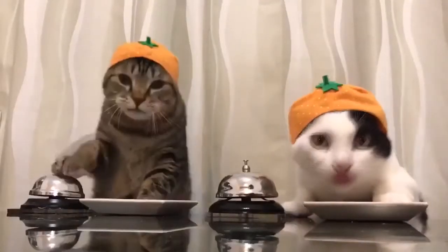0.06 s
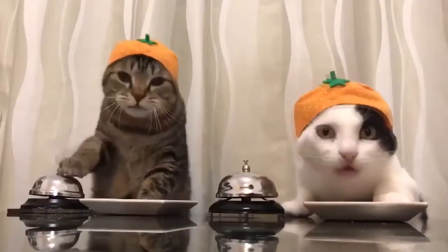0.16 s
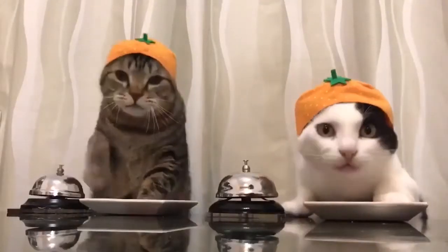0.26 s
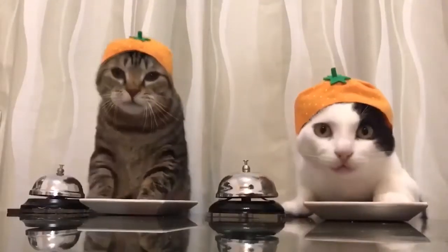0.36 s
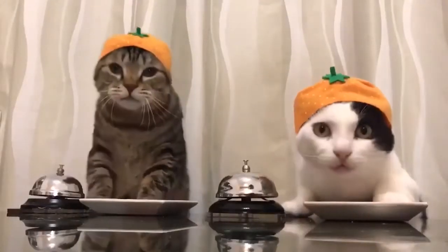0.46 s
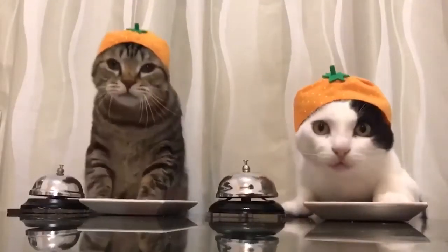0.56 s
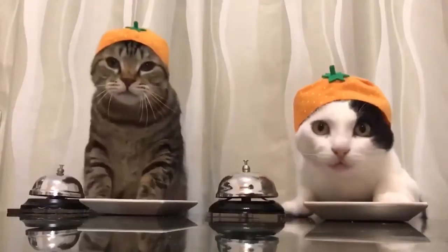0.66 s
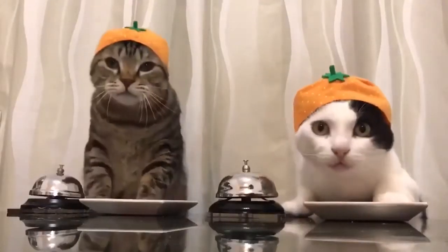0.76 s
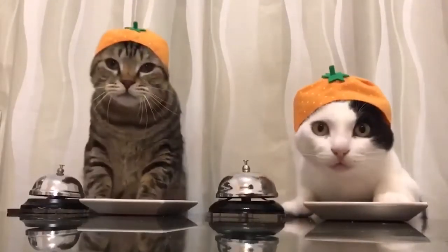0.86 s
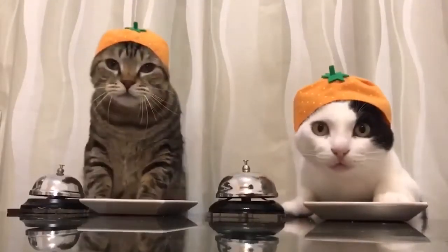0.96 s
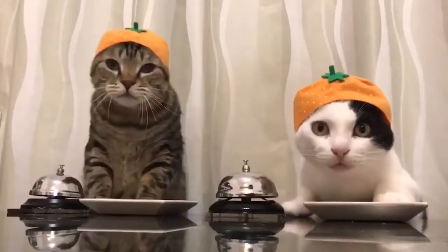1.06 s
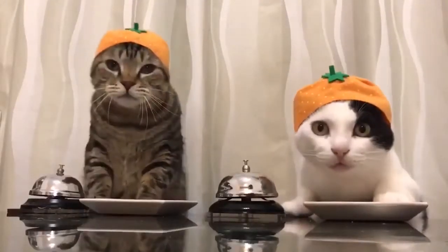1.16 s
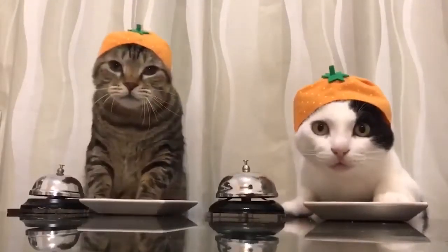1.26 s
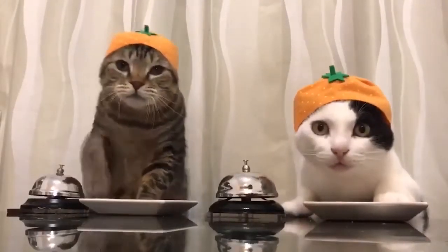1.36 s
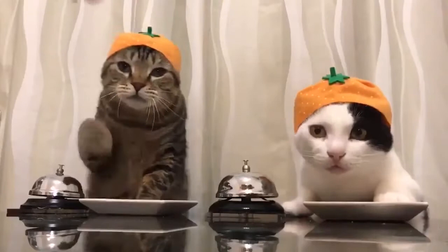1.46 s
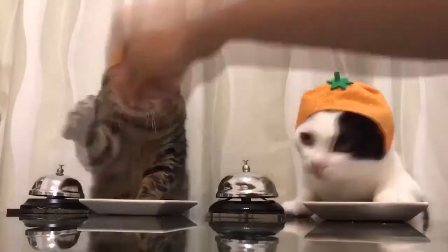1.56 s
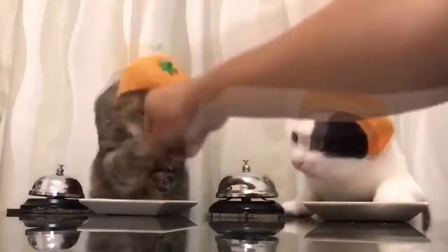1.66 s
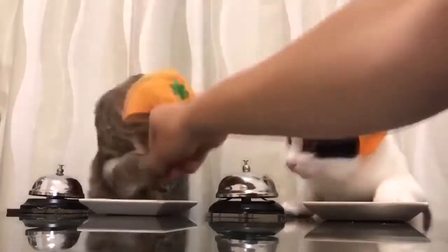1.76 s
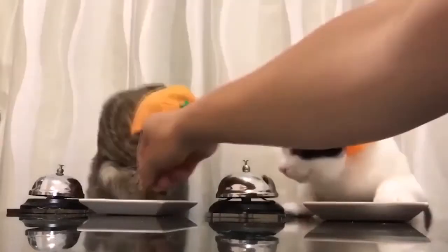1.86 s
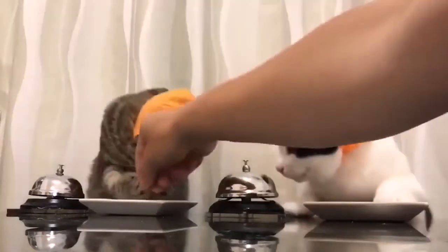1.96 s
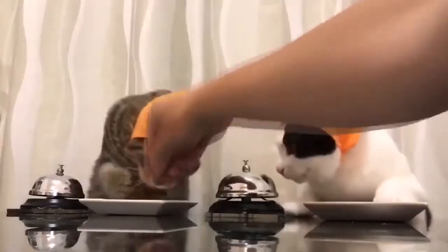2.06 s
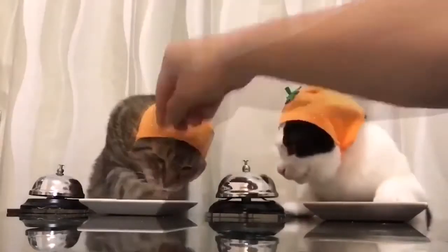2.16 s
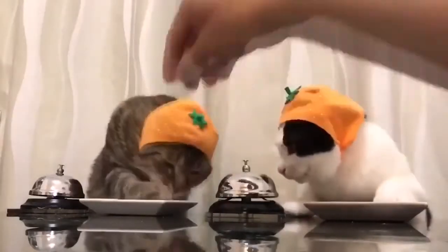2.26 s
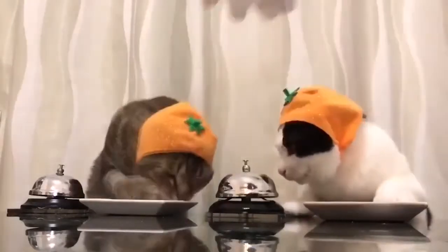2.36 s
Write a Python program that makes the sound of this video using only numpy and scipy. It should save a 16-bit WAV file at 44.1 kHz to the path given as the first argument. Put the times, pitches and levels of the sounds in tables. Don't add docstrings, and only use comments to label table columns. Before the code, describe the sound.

Desk bell struck by a cat's paw, loud piercing ding ringing long, then a treat tapping a plate

```python
import sys
import numpy as np
from scipy import signal
from scipy.fft import rfft, irfft, next_fast_len
from scipy.io import wavfile

SR = 44100
rng = np.random.default_rng(int(sys.argv[2]) if len(sys.argv) > 2 else 0)


def invert_db(x):
    u = np.asarray(x, float) / 20
    return 10 ** u


def generate_wav(sig):
    pcm = np.round(np.clip(np.atleast_2d(sig).T, -1, 1) * 32767).astype(np.int16)
    wavfile.write(sys.argv[1], SR, pcm)


N = 105840

# (frequency [Hz], level [dB])
HUM_COLOUR = [(25, -9.5), (40, -3), (80, -3), (160, -14), (500, -21), (2200, -30.5), (3400, -48),
              (15900, -66.5)]
# (time [s], level [dB])
RUSTLE = [
    (1.3, -87),
    (1.6, -73),
    (2.1, -70.5),
    (2.2, -70.5),
    (2.4, -79.5),
]
# (time [s], level [dB])
SLEEVE_TICKS = [
    (1.822, -64),
    (1.870, -54.5),
    (1.885, -64.5),
]
SLEEVE_COLOUR = [(200, -20), (2000, -1.5), (4000, -5), (6500, 4), (9000, -4), (15900, -31.5)]
# (time [s], level [dB])
STEPS = [(.378, -38), (.483, -44), (.512, -37.5), (.621, -37), (.645, -42.5), (1.1125, -55.5),
         (1.459, -67.5), (1.564, -48), (1.584, -41), (1.797, -52.5), (2.013, -54.5), (2.064, -58)]
# (frequency [Hz], level [dB])
STEP_COLOUR = [(150, -10.5), (400, -2), (900, 6), (1600, 10.5), (2400, -8.5), (3200, -28.5), (6500, -49),
               (15900, -62.5)]
# (time [s], level [dB])
RUMBLES = [
    (.06, -35),
    (.09, -31),
    (.14, -35.5),
    (.24, -25),
    (.44, -35.5),
    (.52, -35.5),
    (.6, -41.5),
    (1.5, -53),
    (2.2, -40),
]
# (frequency [Hz], level [dB])
RUMBLE_COLOUR = [(40, -7.5), (90, -2.5), (200, 0.5), (400, -6), (900, -15), (2500, -28), (4000, -59),
                 (15900, -94.5)]
# (time [s], level [dB])
THUMPS = [
    (.064, -23.5),
    (.255, -31),
    (.47, -35.5),
    (1.56, -36),
]
# (frequency [Hz], level [dB], 60 dB decay [s])
TABLE_MODES = [(92.6, 9.5, .45), (140, -10, .3), (215, -10, .3), (374, -10.5, .2)]
# (time [s], level [dB])
TREAT = [
    (2.178, -66),
    (2.1975, -31),
    (2.211, -58),
    (2.240, -50.5),
    (2.293, -51.5),
    (2.336, -51.5),
    (2.368, -45.5),
    (2.398, -51),
]
# (frequency [Hz], level [dB])
TREAT_COLOUR = [(150, -17), (400, 6), (1500, 12), (2300, -4), (4800, 2), (7000, 5), (9000, -10),
                (15900, -20.5)]
# (frequency [Hz], level [dB], 60 dB decay [s])
PLATE_MODES = [(382, -22.5, 0.09), (920, -28, 0.045), (1560, -16.5, 0.013), (4886, -10.5, 0.026),
               (6340, -21, 0.03)]
# (time [s], level [dB])
PLUNGER = [
    (.045, -39.5),
    (.049, -37),
    (.1285, -28),
    (.141, -41),
    (.2075, -34),
    (.211, -32),
    (.228, -21.5),
    (.420, -27.5),
]
# (frequency [Hz], level [dB])
PLUNGER_COLOUR = [(150, -7.5), (900, -20), (1500, 5.5), (2500, -9), (4300, -6), (6500, -5.5), (10000, -4.5),
                  (15900, -8)]
# (frequency [Hz], level [dB], 60 dB decay [s])
BASE_MODES = [(1350, -32.5, 0.014), (1740, -23, 0.013), (4155, -37, 0.044), (4430, -23, .05),
              (6500, -30, 0.0095), (6900, -30.5, .02), (9400, -17.5, 0.012)]
# (time [s], level [dB])
RATTLE = [
    (.395, -65.5),
    (.42, -27.5),
    (.46, -26.5),
    (.52, -42.5),
    (.6, -63.5),
    (.68, -79.5),
]
# (frequency [Hz], level [dB])
RATTLE_COLOUR = [(1000, -16.5), (3500, -13.5), (4300, -30.5), (5200, -3), (7200, -37), (9800, 11),
                 (11300, -32), (14500, -12.5)]
# (time [s], level [dB])
CRACKS = [
    (.2306, -2),
    (.2325, -13.5),
    (.2385, -11.5),
    (.243, -16.5),
    (.252, -14.5),
    (.262, -18.5),
    (.412, -19.5),
]
# (frequency [Hz], level [dB])
CRACK_COLOUR = [(200, -38), (1400, -19.5), (2200, -30), (7000, -24.5), (8500, 5), (10300, -8), (11500, -13),
                (13300, -7.5), (15900, -15)]
# (frequency [Hz], level [dB], 60 dB decay [s])
STEM_MODES = [(6557, -42, .12), (8010, -38, .05), (8290, -36, .08), (8620, -30, .08), (9310, -36, .1),
              (9964, -36, .15), (10600, -38, .1), (13225, -32, .06)]
BLOWS_S = [
    .2306,
    .411,
]
DOME_HZ = [1123.15, 1710.3, 3020.1, 4886, 5610.4, 6920, 8785.6, 9510, 10600, 10820, 12685.5, 13190, 13410,
           880]
# (60 dB decay [s], level at first blow [dB], level at second blow [dB])
DOME_RINGS = [(46, -46, -36.5), (2.06, -47, -51.5), (6.13, -24.5, -16), (.5, -35.5, -39), (2.2, -10.5, -16),
              (5.1, -58, -61), (0.5967, -6.5, -8), (2.3, -50, -50.5), (6.1, -78, -69), (3.5, -81.5, -71.5),
              (0.55, -28, -30), (.4, -36, -40), (2.2, -59.5, -62.5), (3, -66, -60)]
# (partial [Hz], split [Hz], in step after first blow [s], in step after second blow [s])
TWIN_BEATS = [(1123.15, 38.9, .075, .139), (3020.1, 23.3, .105, .094), (5610.4, 29.4, .0295, .037),
              (6920, 24, 0, 0), (9510, 30, 0, 0), (13410, 30, 0, 0)]
# (60 dB decay [s], level at first blow [dB], level at second blow [dB])
TWIN_RINGS = [(30, -42, -43.5), (4.7, -27, -28), (1.85, -13.5, -22), (4.3, -78, -86), (2.15, -57, -58.5),
              (2, -63.5, -77)]
SWELL_S = [.01, 0.036]
SWELL_SHARE = [0, 0.51]
# (time [s], depth [dB])
FLUTTER = [(0, -38.5), (1.4, -29), (1.7, -18.5), (2.4, -15)]


def colour(x, points):
    hz, db = np.transpose(points)
    size = next_fast_len(N + 4096)
    grid_hz = np.maximum(np.arange(size // 2 + 1) * SR / size, 1)
    gain = invert_db(np.interp(np.log(grid_hz), np.log(hz), db, left=-60))
    return irfft(rfft(x, size) * gain, size)[:N]


def curve(rows):
    s, db = np.transpose(rows)
    return invert_db(np.interp(np.arange(N) / SR, s, db, left=-200, right=-200))


def clicks(rows):
    s, db = np.transpose(rows)
    out = np.zeros(N)
    out[(s * SR).astype(int)] = invert_db(db)
    return out


def fade(x, t60):
    return signal.lfilter([1], [1, -invert_db(-60 / (t60 * SR))], x + 1e-18)


def modes(x, table):
    out = 0
    for hz, db, t60 in table:
        radius = invert_db(-60 / (t60 * SR))
        angle = 2 * np.pi * hz / SR
        feedback = [1, -2 * radius * np.cos(angle), radius * radius]
        out = out + signal.lfilter([0, invert_db(db) * np.sin(angle)], feedback, x)
    return out


def knock(rows, points, snap_s, tail_db, tail_s, body=(), body_db=0):
    wall_cut_hz = 15000
    hit = clicks(rows)
    snap = rng.standard_normal(N) * fade(hit, snap_s)
    echo = rng.standard_normal(N) * invert_db(tail_db) * fade(hit, tail_s)
    dull = np.exp(-2 * np.pi * wall_cut_hz / SR)
    tail = signal.lfilter([1 - dull], [1, -dull], echo)
    ring = modes(snap + 0.3 * tail, body)
    return colour(snap + tail, points) + invert_db(body_db) * ring


def house_hum():
    level_db, flicker_db, flicker_per_s = -56.5, 1.2, 12
    hum = colour(rng.standard_normal(N), HUM_COLOUR)
    flicker = np.interp(np.arange(N) / SR * flicker_per_s, np.arange(40), rng.standard_normal(40))
    return invert_db(level_db + flicker_db * flicker) * hum / hum.std()


def sleeve():
    hiss = colour(rng.standard_normal(N) * curve(RUSTLE), SLEEVE_COLOUR)
    return hiss + knock(SLEEVE_TICKS, SLEEVE_COLOUR, snap_s=0.044, tail_db=-13.5, tail_s=0.27)


def paw_steps():
    return knock(STEPS, STEP_COLOUR, snap_s=0.05, tail_db=-11.5, tail_s=0.35)


def table_rumble():
    return knock(RUMBLES, RUMBLE_COLOUR, snap_s=0.19, tail_db=-4.5, tail_s=0.67)


def table_thumps():
    push_s = 0.0057
    r = np.exp(-1 / (push_s * SR))
    push = signal.lfilter([(1 - r) ** 2], [1, -2 * r, r * r], clicks(THUMPS) + 1e-18)
    return modes(push, TABLE_MODES)


def treat_on_plate():
    return knock(TREAT, TREAT_COLOUR, snap_s=0.036, tail_db=-21.5, tail_s=0.51,
                 body=PLATE_MODES, body_db=-5)


def plunger():
    return knock(PLUNGER, PLUNGER_COLOUR, snap_s=0.058, tail_db=-11, tail_s=0.52,
                 body=BASE_MODES, body_db=-6)


def plunger_rattle():
    contacts_per_s = 1500
    touching = rng.random(N) < contacts_per_s / SR
    ticks = touching * rng.standard_normal(N) * curve(RATTLE)
    return invert_db(2.5) * modes(ticks + 1e-18, BASE_MODES) + invert_db(16) * colour(ticks, RATTLE_COLOUR)


def clapper():
    return knock(CRACKS, CRACK_COLOUR, snap_s=0.021, tail_db=-8, tail_s=0.17,
                 body=STEM_MODES, body_db=-5)


def flutter():
    low_pass = signal.butter(2, 31.8, fs=SR, output="sos")
    waver = signal.sosfilt(low_pass, rng.standard_normal(N))
    return 1 + curve(FLUTTER) * waver / waver.std()


def dome():
    handover_s = 0.012
    paw_loss = 0.5
    late_loss = 2
    swell_full_hz = 8340
    t = np.arange(N) / SR
    partials = [(hz, 0, 0, 0, *ring) for hz, ring in zip(DOME_HZ, DOME_RINGS)]
    twins = [(*beat, *ring) for beat, ring in zip(TWIN_BEATS, TWIN_RINGS)]
    hz, split, crest_a, crest_b, t60, db_a, db_b = np.array(partials + twins).T[:, :, None]
    main_note = abs(hz - DOME_HZ[2]) < 1
    handover = np.clip((t - BLOWS_S[1]) / handover_s, 0, 1)
    blows = [(db_a, crest_a, 1 - handover, paw_loss), (db_b, crest_b, handover, 0)]
    out = 0
    for k, (db, crest, gate, damping) in enumerate(blows):
        age = np.maximum(t - BLOWS_S[k], 0)
        loss_db = 60 * age / t60 + damping * hz / 1000 * age + late_loss * age ** 2 * main_note
        phase = 2 * np.pi * (hz * age + split * (age - crest))
        held_back = np.minimum(SWELL_SHARE[k] * hz / swell_full_hz, 0.95)
        swell = 1 - held_back * np.exp(-age / SWELL_S[k])
        ring = invert_db(db - loss_db) * np.sin(phase) * swell
        out = out + gate * (age > 0) * np.sum(ring, axis=0)
    return out


def scene():
    background = house_hum() + sleeve() + paw_steps() + table_rumble() + table_thumps()
    contacts = treat_on_plate() + plunger() + plunger_rattle() + clapper()
    right = background + contacts + dome() * flutter()
    return np.array([np.zeros(N), right])


def band_limit(x):
    return signal.sosfilt(signal.butter(12, 15980, fs=SR, output="sos"), x)


def record(dry):
    low_cut = signal.butter(4, 36, "highpass", fs=SR, output="sos")
    high_cut = signal.cheby2(8, 50, 16600, fs=SR, output="sos")
    heard = signal.sosfilt(np.vstack([low_cut, high_cut]), dry)
    mix = np.clip(heard, -1.0, 1.0)
    return band_limit(mix)


dry = scene()
out = record(dry)
generate_wav(out)
```